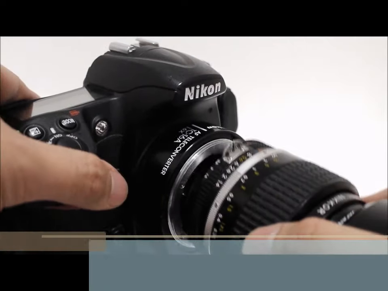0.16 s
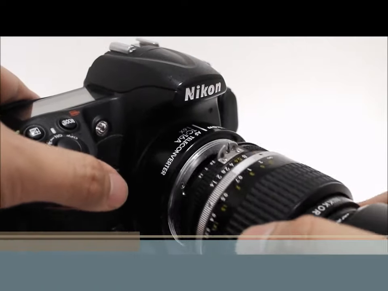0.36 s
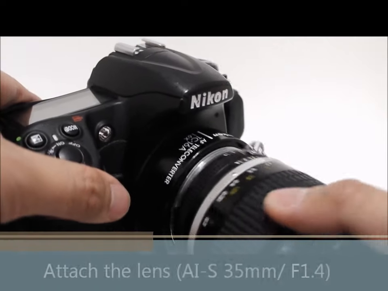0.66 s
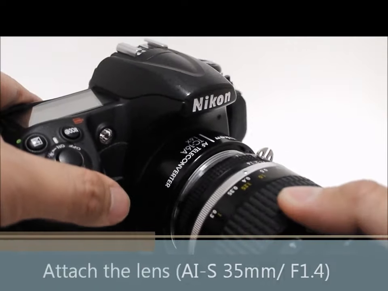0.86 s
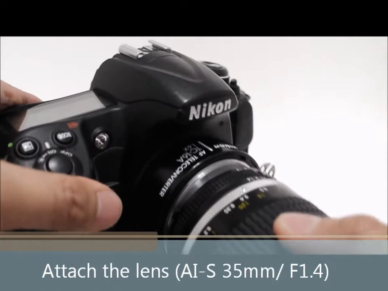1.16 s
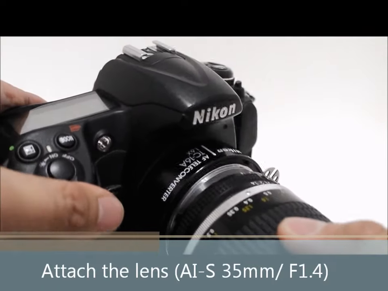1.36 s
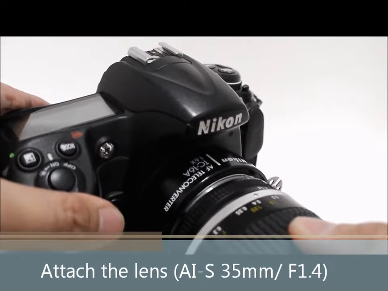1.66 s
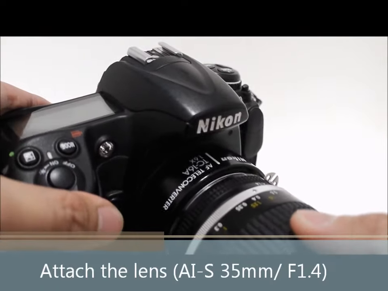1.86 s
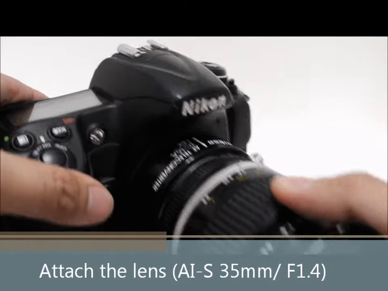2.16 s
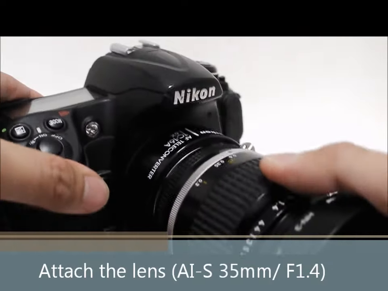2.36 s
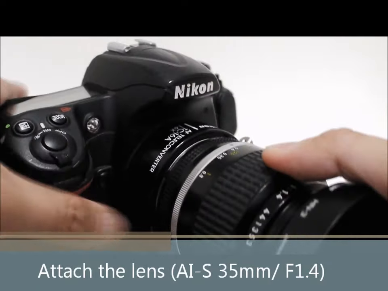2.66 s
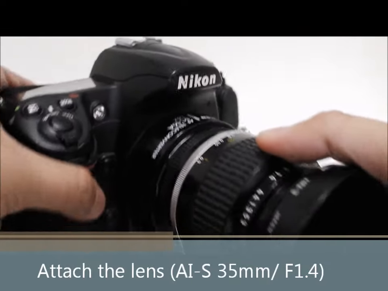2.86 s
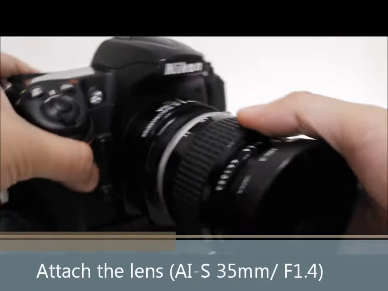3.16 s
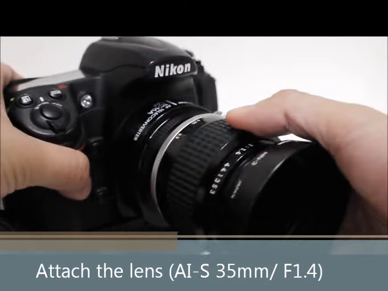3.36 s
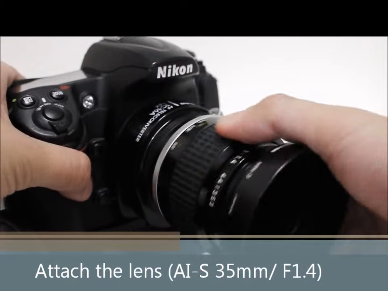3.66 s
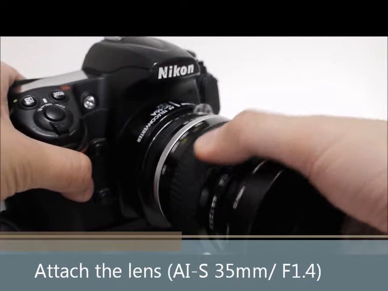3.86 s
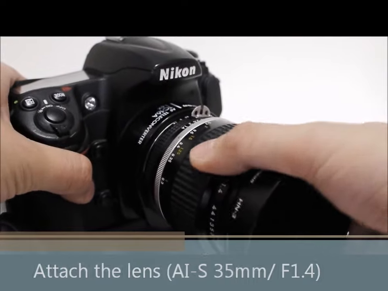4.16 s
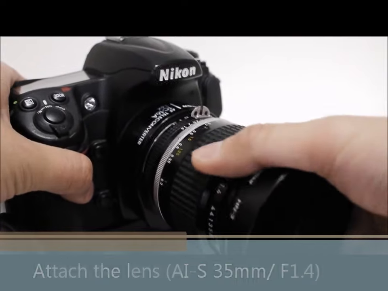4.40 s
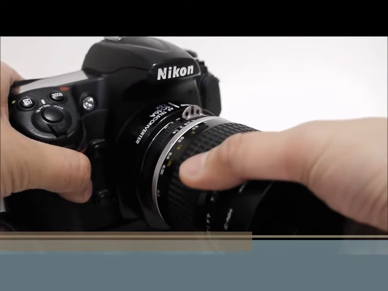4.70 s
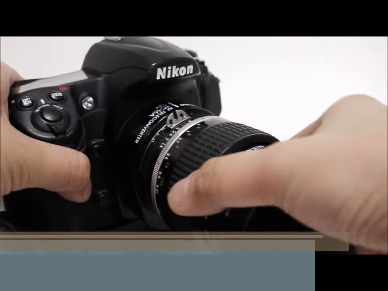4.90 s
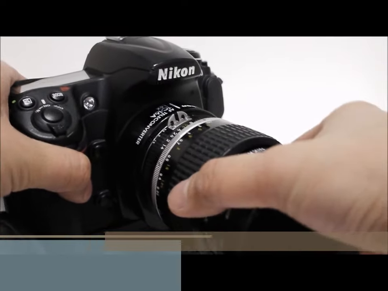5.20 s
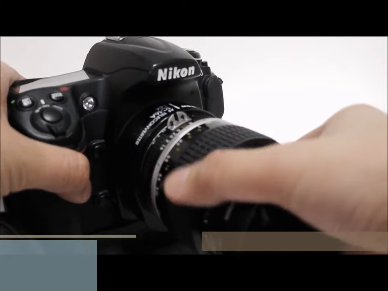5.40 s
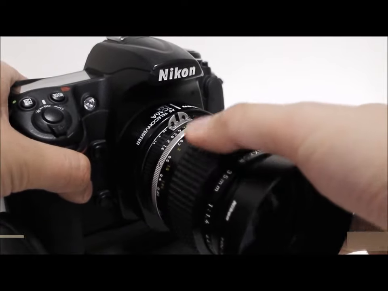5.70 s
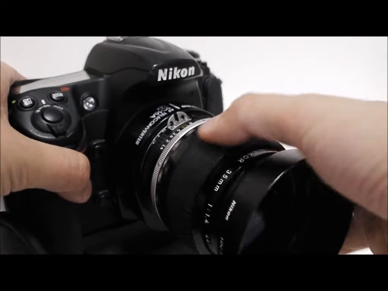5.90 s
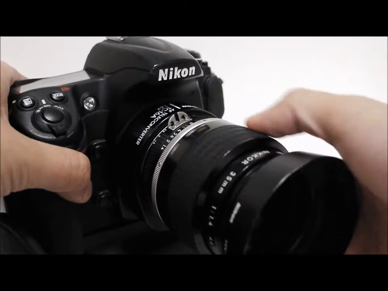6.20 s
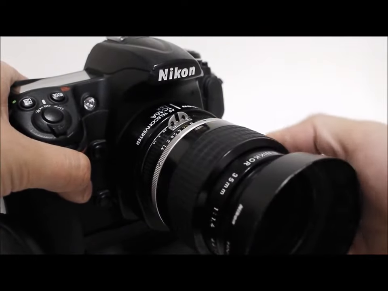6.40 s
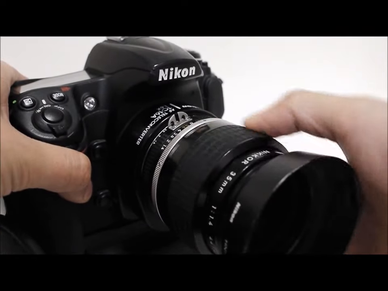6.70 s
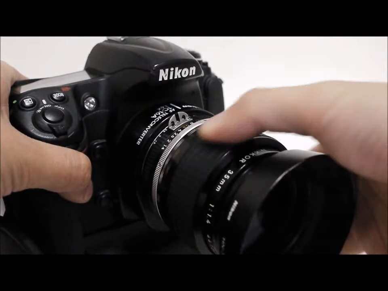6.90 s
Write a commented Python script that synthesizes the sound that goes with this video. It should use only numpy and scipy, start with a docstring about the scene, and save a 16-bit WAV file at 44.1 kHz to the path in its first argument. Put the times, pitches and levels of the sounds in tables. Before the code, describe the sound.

A camera lens is seated in its metal mount with dry clacks, hard snaps and short rubbing slides over quiet room hiss.

```python
"""Hard contacts of a metal lens being seated in a camera's bayonet mount; the camera is turned, its buttons pressed.
Each contact is a burst of random-sign impulses that excites damped modes of the hollow body and the steel mount.
Between them surfaces rub: a dense train of random slips, coloured and shaped by the envelope of each slide.
Soft low thuds, booms and one faint spring-like ring join in, over room hiss, a passing low hum and a high whine.
An automatic gain drops after the loudest snaps and creeps back."""
import sys
import numpy as np
from scipy import signal
from scipy.fft import rfft, irfft, next_fast_len
from scipy.io import wavfile
from scipy.ndimage import uniform_filter1d

SR = 44100
rng = np.random.default_rng(int(sys.argv[2]) if len(sys.argv) > 2 else 0)


def generate_wav(signal):
    """Clip the signal to [-1, 1] and save it as 16-bit WAV at the path in sys.argv[1]."""
    frames = np.transpose(np.atleast_2d(signal))
    scaled = np.clip(frames, -1, 1) * 32767
    pcm = np.round(scaled).astype(np.int16)
    wavfile.write(sys.argv[1], SR, pcm)


N = 310905  # length in samples
TIME = np.arange(N) / SR  # seconds

# Spectrum of the room hiss. Each row: frequency in Hz, relative density in dB per Hz.
HISS_SPECTRUM = [(30, -15), (90, -12.5), (150, -12), (260, -1.5), (420, 0.5), (620, 0.5), (735, 3.5),
                 (850, -0.5), (1100, 0), (1900, -5), (2600, -7.5), (6000, -14), (12000, -19.5),
                 (16000, -24)]
HISS_DB = -61.5  # mean level

# A low hum that dies away. Each row: time in seconds, mean level in dB.
HUM_LEVELS = [(0, -84), (.12, -76), (.5, -77), (.8, -82), (1.0, -78), (1.15, -100)]

# A small metal part sings on faintly.
# Each row: frequency in Hz, starting level in dB before flutter, t60 in seconds.
SPRING_PARTIALS = [(1790, -65, .35), (4048, -68.5, .9), (8150, -78, 1.2), (10718, -79, 1.4)]
SPRING_AT_S = 5.515

# Finger pads land on the barrel. Each row: start in seconds, level in dB before swell and decay.
FINGER_BUMPS = [(0.14, -59.5), (1.895, -59), (3.19, -59.5), (3.395, -56)]

# Heavy blows make the support boom. Each row: start in seconds, level in dB before swell and decay.
SUPPORT_BOOMS = [(1.549, -54), (1.584, -66), (2.17, -43)]

# Short slides of fingers and metal. Each row: start in seconds, length in seconds,
# level in dB before the zone levels, tilt in dB per octave about the middle zone.
SLIDES = [(0.141, 0.05, -69, 3.5), (0.5, .05, -61, 2), (0.531, 0.045, -63.5, 10),
          (0.625, 0.035, -69.5, -9.5), (0.71, 0.056, -75, -12.5), (2.569, 0.076, -65, -1.5),
          (3.183, .06, -68, -6), (3.538, 0.056, -70.5, -7), (3.64, 0.13, -68.5, 1.5), (3.755, 0.12, -60, 1),
          (4.204, 0.093, -67.5, -1.5), (4.437, 0.052, -67, 0.5), (4.676, .09, -65.5, 1),
          (4.753, 0.118, -59, 3), (4.874, 0.046, -67, 10.5), (4.932, 0.043, -62, -5)]
RUB_ATTACK_S, RUB_RELEASE_T60_S = 0.0051, 0.14

# A long scrape as the camera is turned, sliding on the table.
# Each row: time in seconds, level in dB before the offset SCRAPE_DB and the zone levels.
SCRAPE_LEVELS = [(2.7, -64), (2.86, -51), (2.896, -44.5), (2.942, -51), (3.1, -50), (3.125, -55)]
SCRAPE_DB, SCRAPE_TILT_DB_PER_OCTAVE = -4, -2.5

# Colour of friction. Each row: frequency in Hz, relative density in dB per Hz.
FRICTION_SPECTRUM = [(250, -12), (550, 0.5), (850, 8), (1300, 0), (2200, -1), (3400, -4.5), (4500, -7),
                     (7000, -9), (12000, -13), (16000, -25.5)]

# Zones of friction, from skin and heavy body to bare metal. Each row: centre in Hz, level in dB.
FRICTION_ZONES = [(1200, -4), (3400, 0.5), (10500, -4.5)]

# Modes of camera and lens, hollow body below 2 kHz and steel mount above.
# Each row: frequency in Hz, relative level in dB.
BODY_MODES = [(262, -5.5), (413, -7), (528, -11.5), (750, 0), (810, -8.5), (950, -2.5), (1198, -13),
              (1290, -33), (1445, -9.5), (1695, -4), (1970, -10), (2620, -10.5), (2900, -20), (3160, -6),
              (3490, -2), (4535, -6.5), (4900, -21), (6280, -3.5), (7010, -4.5), (8200, -26), (8670, -17),
              (9630, -8), (11260, -7), (13200, 6)]

# Contacts in order: the lens feels for its place, drops in and is pressed home, the camera is turned,
# the catch snaps in, and last come a dull button-like press and a bright late knock.
# Each row: start in seconds, nominal contact length in ms (before the chatter factor),
# level in the hollow body in dB, level in the steel in dB (both before the shared colour),
# treble slope in dB per octave, pitch that this spot favours in Hz.
CONTACTS = [ (0.0183, 0.74, -88, -47, -3, 8300), (0.0351, 0.88, -57.5, -41.5, 0, 9100),
            (0.058, 2, -78, -63, 0, 4300), (0.1399, 3.8, -75, -64, -0.5, 870),
            (0.379, 5.4, -51, -61.5, -7, 1880), (0.4613, 2.2, -44, -46, -2.5, 690),
            (0.538, 1.1, -54, -59.5, -4, 240), (0.608, 1.3, -55.5, -65, -12, 816),
            (0.654, 5.3, -54.5, -63.5, -3, 745), (0.665, 0.78, -52, -63, -1.5, 740),
            (0.733, 3, -58.5, -66, -7, 744), (0.823, 3, -48.5, -56, -3.5, 686),
            (0.88, 0.62, -50, -59, -4, 3200), (1.015, 0.58, -53.5, -58.5, -7, 3800),
            (1.0381, 0.87, -47.5, -59.5, -4, 1140), (1.1348, 1.8, -56, -65, -2, 730),
            (1.5375, 3.4, -53, -50.5, -3.5, 437), (1.5482, 5, -49, -52, -2.5, 342),
            (1.5741, 2.2, -41.5, -48, 3.5, 3170), (1.585, 1.2, -39.5, -39.5, -5, 6160),
            (1.867, 1.5, -60.5, -63.5, .5, 6000), (2.1617, 7.1, -51, -52, -2, 730),
            (2.1684, 0.66, -34, -35, -13, 1530), (2.1697, 1.2, -39, -42.5, 4.5, 1850),
            (2.433, 1.6, -64, -56.5, -7, 950), (2.514, 0.81, -61, -65.5, -1, 2290),
            (2.5689, 1.3, -66, -57, -2, 3030), (2.608, 1, -56, -59, -12, 970),
            (2.666, 3.8, -56.5, -51.5, -14.5, 740), (3.133, 0.8, -45, -51.5, -1.5, 1470),
            (3.277, 4, -52.5, -54.5, -14, 1030), (3.4065, 1, -64, -67.5, -4, 3220),
            (3.526, 1.3, -74, -63, -3, 260), (3.74, 0.93, -53.5, -47.5, -2.5, 310),
            (4.1552, 2.2, -42.5, -46.5, -6.5, 1860), (4.21, 0.83, -61, -54, -6.5, 1750),
            (4.712, 1.6, -70, -65, -2, 3500), (4.76, 0.98, -71, -59, 0, 3500),
            (4.8182, 3.1, -75, -54, -1, 4150), (4.8638, 0.61, -57, -46, 2.5, 6200),
            (4.8663, 0.61, -45.5, -39.5, 6, 4730), (4.937, 6, -55.5, -50, -31, 1030),
            (5.143, 4.2, -69, -60.5, -8, 950), (5.168, 3.9, -43.5, -48, -7.5, 1930),
            (5.4771, 1.5, -66, -60, -8.5, 3840), (6.979, 0.52, -51.5, -39, 0.5, 2920),
            (6.9804, 1.2, -42, -59, -3, 515)]

# Edges of the seven bands in which each attack is balanced. Each entry: frequency in Hz.
BAND_EDGES_HZ = [130, 320, 620, 1100, 2200, 4200, 8000, 16000]

# Colour that all contacts share. Each entry: level offset in dB of one of the seven bands.
SHARED_COLOUR_DB = [-12.5, -6, -1.5, -0.5, -0.5, 2, -0.5]
BODY_HZ, STEEL_HZ = 830, 3000  # where the body and steel levels of a contact apply
SPOT_DB, SPOT_OCTAVES = 9, 0.19  # prominence and spread of the favoured pitch

TOP_HZ = 15900  # upper limit of the microphone chain


def undb(db):
    """Decibel definition: amplitude ratio 10 ** (dB / 20)."""
    return 10 ** (np.asarray(db) / 20)


def unit(x):
    """Normalisation to an rms of 1."""
    return x / np.sqrt(np.mean(x ** 2) + 1e-30)


def band(x, lo_hz, hi_hz, order=3):
    """Band-pass filtering by a causal Butterworth filter."""
    sos = signal.butter(order, [lo_hz, min(hi_hz, SR / 2 - 100)], "band", fs=SR, output="sos")
    return signal.sosfilt(sos, x)


def fade(t, t60):
    """Exponential damping, 60 dB down after t60 seconds."""
    return np.exp(-np.log(1000) * t / t60)


def swell(t, rise_s):
    """Exponential build-up of a resonance towards 1."""
    return 1 - np.exp(-t / rise_s)


def walk(rate):
    """Random wander: normal draws, rate per second, joined by straight lines and scaled to rms 1."""
    knots = np.arange(0, N / SR + 1, 1 / rate)
    return unit(np.interp(TIME, knots, rng.standard_normal(len(knots))))


def add(out, s, x):
    """Superposition: mix x into out from time s."""
    i = max(int(s * SR), 0)
    out[i:i + len(x)] += x[:len(out) - i]


def colour(x, hz, db):
    """Minimum-phase equalisation: the folded cepstrum makes the response through (Hz, dB) points causal."""
    size = next_fast_len(len(x) // 2 + 2048) * 2
    freqs = np.maximum(np.arange(size // 2 + 1) * SR / size, 1)
    response_db = np.interp(np.log(freqs), np.log(hz), db)
    cepstrum = irfft(np.log(undb(response_db)))
    cepstrum[1:size // 2] *= 2
    cepstrum[size // 2 + 1:] = 0
    response = np.exp(rfft(cepstrum))
    return irfft(rfft(x, size) * response)[:len(x)]


def background(hum_hz=145, whine_db=-83, waver_db=-0.14):
    """Noise and tone: coloured hiss, a frequency-wandering hum and a whine of narrow-band noise."""
    hiss = unit(colour(rng.standard_normal(N), *np.transpose(HISS_SPECTRUM)))
    hiss = hiss * undb(HISS_DB + waver_db * walk(7.1))
    hum_db = np.interp(TIME, *np.transpose(HUM_LEVELS)) + 1.1 * walk(4.7)
    hum_phase = 2 * np.pi * np.cumsum(hum_hz + walk(18)) / SR
    hum = np.sqrt(2) * np.sin(hum_phase) * undb(hum_db)
    whine = unit(band(rng.standard_normal(N), 13470, 13730, order=1))
    return hiss + hum + undb(whine_db) * whine


def spring(flutter_db=3):
    """Free vibration: a few damped pure partials, each with a fluttering level."""
    out, t = np.zeros(N), np.arange(SR) / SR
    for hz, db, t60 in SPRING_PARTIALS:
        level = undb(db + flutter_db * walk(25)[:SR])
        add(out, SPRING_AT_S, level * np.sin(2 * np.pi * hz * t) * fade(t, t60))
    return out


def bumps(lo_hz=180, hi_hz=400, swell_s=0.0047, t60=0.31):
    """Soft impact: a yielding finger pad stirs only the lows of the body, here damped band noise."""
    out, t = np.zeros(N), np.arange(SR // 4) / SR
    for s, db in FINGER_BUMPS:
        thud = unit(band(rng.standard_normal(len(t)), lo_hz, hi_hz, order=2))
        add(out, s, undb(db) * thud * swell(t, swell_s) * fade(t, t60))
    return out


def booms(boom_hz=154, t60=0.23, swell_s=0.0036):
    """Damped resonance: one low mode swells and dies after a heavy blow."""
    out, t = np.zeros(N), np.arange(SR // 2) / SR
    ring = np.sin(2 * np.pi * boom_hz * t) * swell(t, swell_s) * fade(t, t60)
    for s, db in SUPPORT_BOOMS:
        add(out, s, undb(db) * ring)
    return out


def camera(direct_db=18, mode_db=-1, spread_db=0):
    """Modal superposition: the impulse response is a bare tick plus damped modes, the high ones dying first."""
    t = np.arange(SR // 4) / SR
    ring = np.zeros(len(t))
    # each place of contact favours other modes
    places = rng.uniform(-1, 1, len(BODY_MODES))
    for (hz, db), place in zip(BODY_MODES, places):
        t60 = .085 / np.sqrt(hz / 1000)
        mode = np.cos(2 * np.pi * hz * t) * fade(t, t60)
        ring += undb(db + mode_db + spread_db * place) * mode / np.linalg.norm(mode)
    ring[0] += undb(direct_db)
    return ring


def room(low_db=-3, mid_db=-6.0, high_db=-10, build_s=0.0081):
    """Diffuse reverberation: decaying noise in three bands, the lows the wettest."""
    t = np.arange(SR // 4) / SR
    decay = fade(t, .18) * (1 - np.exp(-(t / build_s) ** 2))
    tail = 0
    for lo, hi, db in [(122, 680, low_db), (714, 2560, mid_db), (2400, 17000, high_db)]:
        echoes = rng.standard_normal(len(t)) * decay
        tail = tail + undb(db) * band(echoes / np.linalg.norm(echoes), lo, hi, order=2)
    return tail


def stroke(start, length):
    """Sliding envelope: the motion gets going, holds and dies away exponentially."""
    attack = np.clip((TIME - start) / RUB_ATTACK_S, 0, 1)
    return attack * fade(np.maximum(TIME - start - length, 0), RUB_RELEASE_T60_S)


def rub_envelopes():
    """Amplitude modulation of friction: (envelope, tilt) of every short slide and of the long scrape."""
    slides = [(stroke(s, length) * undb(db), tilt) for s, length, db, tilt in SLIDES]
    s, scrape_db = np.transpose(SCRAPE_LEVELS)
    scrape = stroke(s[0], s[-1] - s[0]) * undb(np.interp(TIME, s, scrape_db) + SCRAPE_DB)
    return slides + [(scrape, SCRAPE_TILT_DB_PER_OCTAVE)]


def rubs(body, grain_db=2.5, uneven_db=1.5, direct_db=3):
    """Stick-slip friction: tiny ridges catch and slip, a dense rain of impulses heard directly and through the body."""
    ridges_db = grain_db * np.minimum(rng.exponential(size=N), 4) + 0.43 * walk(500)
    slips = rng.standard_normal(N) * undb(ridges_db + uneven_db * walk(70))
    through_body = signal.fftconvolve(slips, body)[:N]
    sound = colour(through_body + undb(direct_db) * slips, *np.transpose(FRICTION_SPECTRUM))
    slides = rub_envelopes()
    log_hz = np.log(np.maximum(np.arange(N // 2 + 1) * SR / N, 1))
    zone_hz, zone_db = np.transpose(FRICTION_ZONES)
    out = 0
    # three overlapping zones: skin and the heavy body sound low, bare metal high
    for share, hz, db in zip(np.eye(3), zone_hz, zone_db):
        zone = irfft(rfft(sound) * np.interp(log_hz, np.log(zone_hz), share), N)
        octaves = np.log2(hz / zone_hz[1])
        # overlapping slides add in power
        power = sum((envelope * undb(tilt * octaves)) ** 2 for envelope, tilt in slides)
        out = out + unit(zone) * np.sqrt(power) * undb(db)
    return out


def contact_levels(body_db, steel_db, slope_db, hz):
    """Impact spectrum: the body rules the lows, the steel the highs, and a harder contact lifts the treble."""
    octaves = np.log2(hz / STEEL_HZ)
    between = np.interp(octaves, [np.log2(BODY_HZ / STEEL_HZ), 0], [body_db, steel_db])
    return between + slope_db * np.maximum(octaves, 0) + np.array(SHARED_COLOUR_DB)


def contact_force(t, contact_ms, chatter=2.13, rise_share=0.18, near_db=-4, near_t60=0.035):
    """Chattering impact: random-sign impulses build and die; hands and table throw the blow back soon after."""
    span = chatter * max(contact_ms, .7) / 1000  # decay constant in seconds
    push = swell(t, rise_share * span) * np.exp(-t / span)
    near = fade(t, near_t60) * (1 - np.exp(-(t / 0.00074) ** 2))
    push = np.hypot(push / np.linalg.norm(push), undb(near_db) * near / np.linalg.norm(near))
    return push * rng.choice([-1., 1.], len(t))


def favour(ring, spot_hz, t60=0.13):
    """Position-dependent excitation: the struck spot favours one pitch, evening out as the ring spreads."""
    octaves = np.linspace(-1, 1, 17)
    peak_db = SPOT_DB * np.exp(-.5 * (octaves / SPOT_OCTAVES) ** 2)
    coloured = colour(ring, spot_hz * 2 ** octaves, peak_db)
    return ring + (coloured - ring) * fade(np.arange(len(ring)) / SR, t60)


def clicks(sub_db=-12, top_db=-2, wet_db=19, dulling=0.96):
    """Impact excitation of modes: each contact force rings the camera and the room, with its own colour."""
    out = np.zeros(N)
    t = np.arange(SR // 30) / SR
    first = int(.012 * SR)  # the attack whose band levels are set
    edges = np.array(BAND_EDGES_HZ, float)
    filters = [signal.butter(3, pair, "band", fs=SR, output="sos") for pair in zip(edges, edges[1:])]
    centres = np.r_[edges[0] / 2, np.sqrt(edges[:-1] * edges[1:]), edges[-1]]
    for s, contact_ms, body_db, steel_db, slope_db, spot_hz in CONTACTS:
        levels = contact_levels(body_db, steel_db, slope_db, centres[1:-1])
        force = contact_force(t, contact_ms)
        # the room gathers sound from all sides of the camera, so its tail is smooth
        ring = signal.fftconvolve(force, camera(spread_db=6.0))[:SR // 4] + undb(wet_db) * room()
        # a soft contact keeps losing treble up to the very top
        soft_db = top_db + dulling * np.clip(levels[-1] - levels[-2], -10, 0)
        # bring each band of the attack to its level, first roughly, then finely; the first pass shapes both ends
        for low_end_db, high_end_db in [(sub_db, soft_db), (0, 0)]:
            powers = [np.mean(signal.sosfilt(f, ring[:first]) ** 2) for f in filters]
            gains = levels - 10 * np.log10(powers)
            ring = colour(ring, centres, np.r_[gains[0] + low_end_db, gains, gains[-1] + high_end_db])
        add(out, s, favour(ring, spot_hz))
    return out


def scene():
    """Superposition of all sources at one close microphone."""
    return (background() + spring() + bumps() + booms() + rubs(camera()) + clicks())[None]


def gain_control(x, threshold_db=-27, slope=0.38, recover_db_per_s=3.5):
    """Dynamic compression: loud snaps turn the gain down within some 20 ms; it recovers slowly."""
    loud_db = 10 * np.log10(np.maximum(uniform_filter1d(x ** 2, size=176), 1e-12))
    # a running maximum that falls at a steady rate
    recovery_db = recover_db_per_s * TIME
    held_db = np.maximum.accumulate(loud_db + recovery_db, axis=-1) - recovery_db
    excess_db = np.maximum(held_db - threshold_db, 0)
    pole = np.exp(-1 / (0.015 * SR))
    return x * undb(-slope * signal.lfilter([1 - pole], [1, -pole], excess_db))


def record(dry, low_cut_hz=122, leak_db=-22):
    """Microphone chain: a leaky low cut, automatic gain, saturation that rounds peaks, then the top cut."""
    low_cut = signal.butter(6, low_cut_hz, "high", fs=SR, output="sos")
    x = signal.sosfilt(low_cut, dry) + undb(leak_db) * dry
    ceiling = .3
    x = ceiling * np.tanh(gain_control(x) / ceiling)
    return signal.sosfilt(signal.ellip(10, .2, 70, TOP_HZ, fs=SR, output="sos"), x)


dry = scene()
out = record(dry)
generate_wav(out)
```